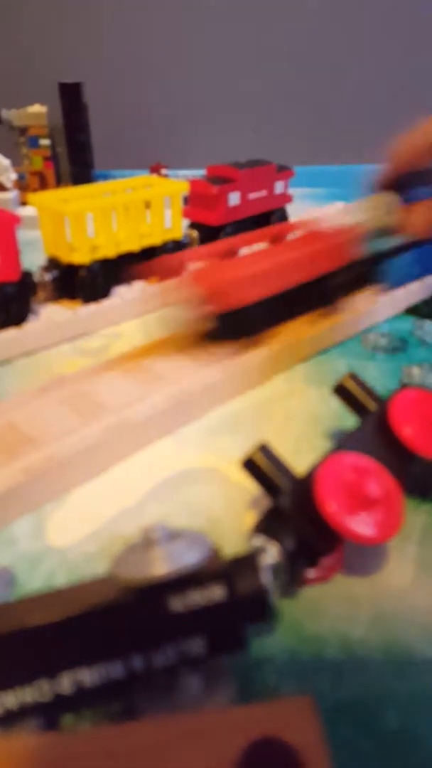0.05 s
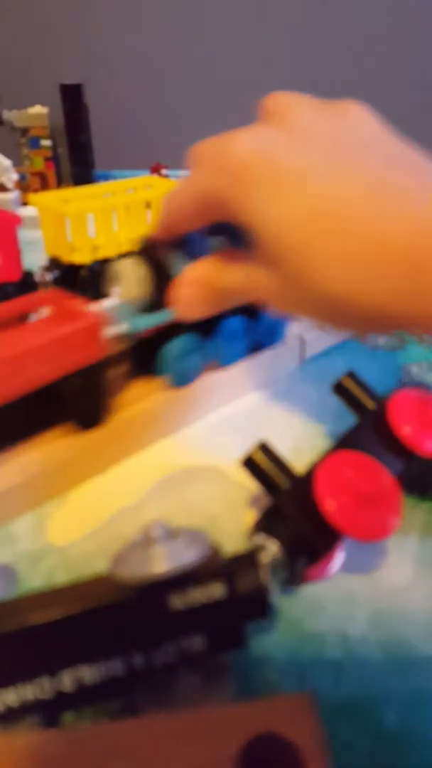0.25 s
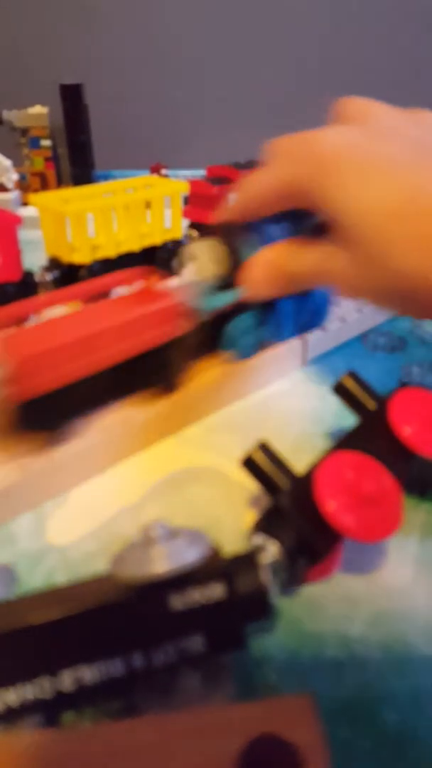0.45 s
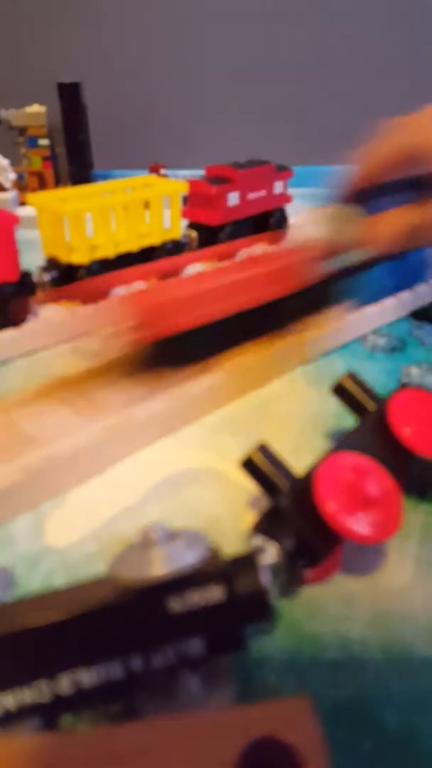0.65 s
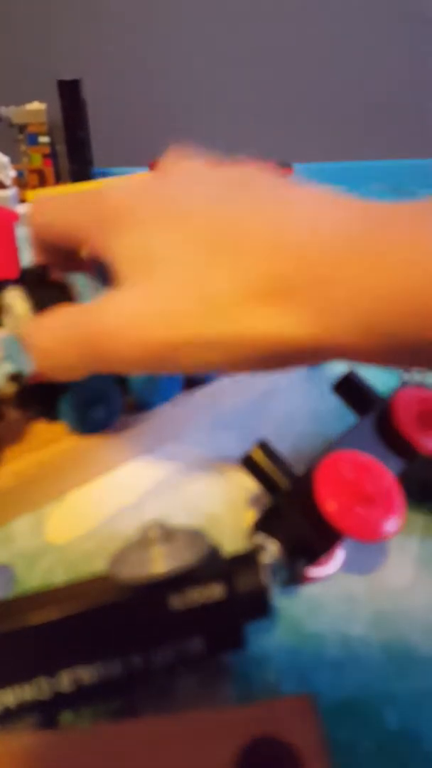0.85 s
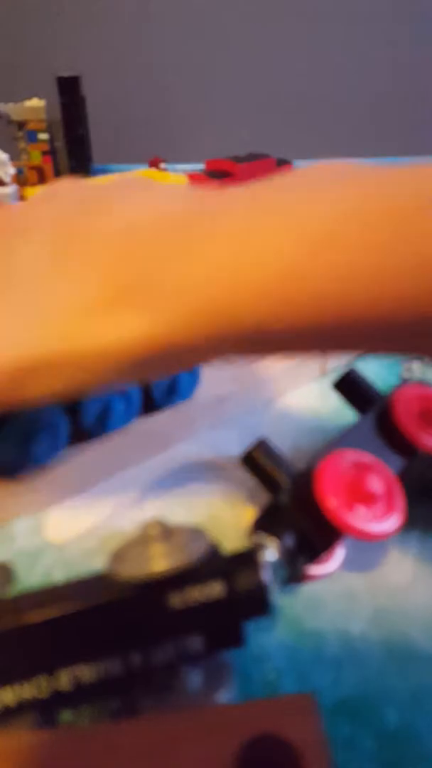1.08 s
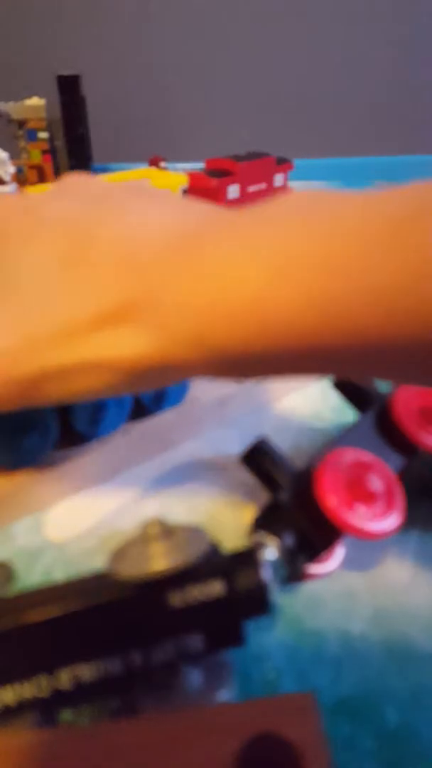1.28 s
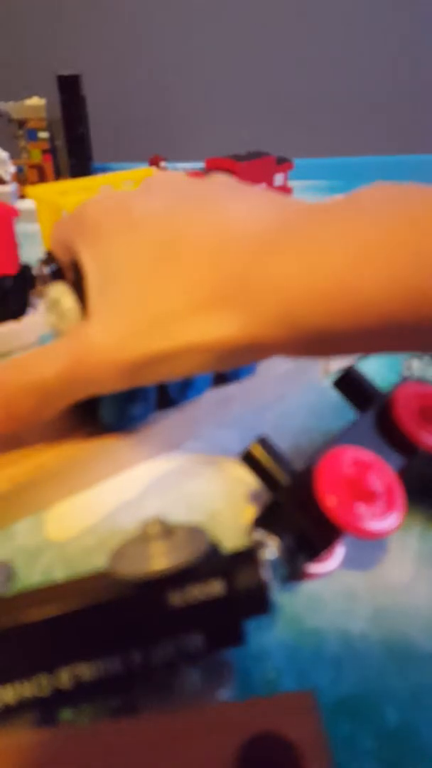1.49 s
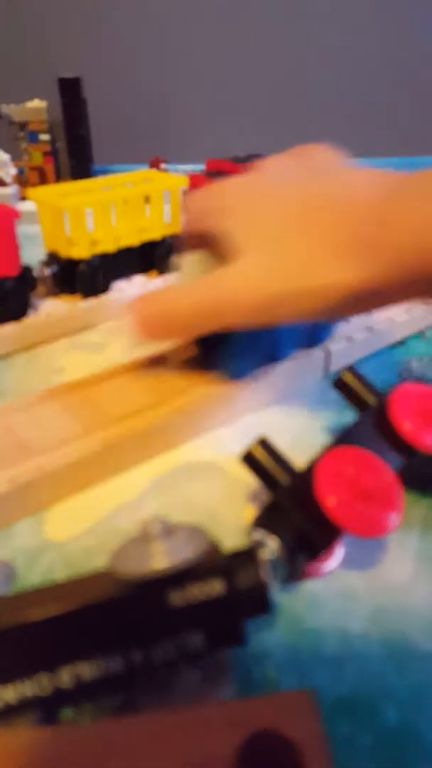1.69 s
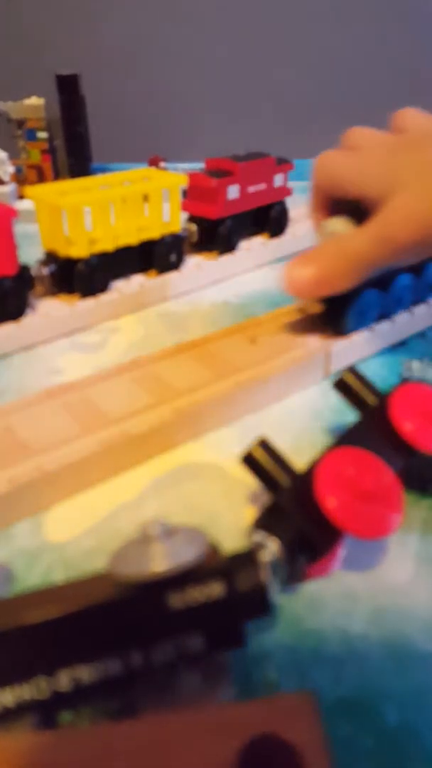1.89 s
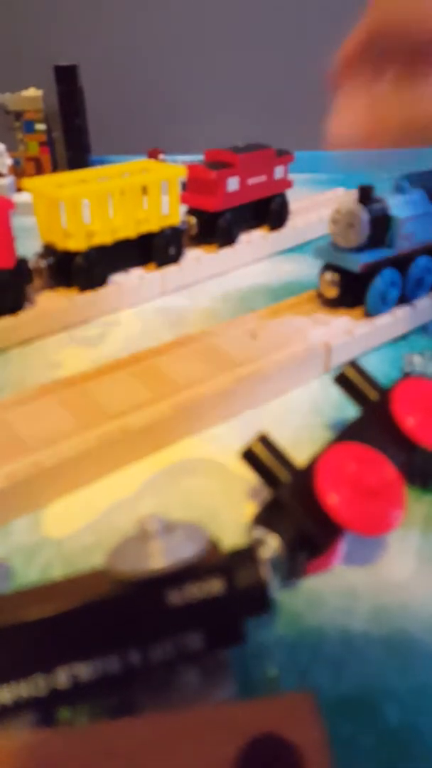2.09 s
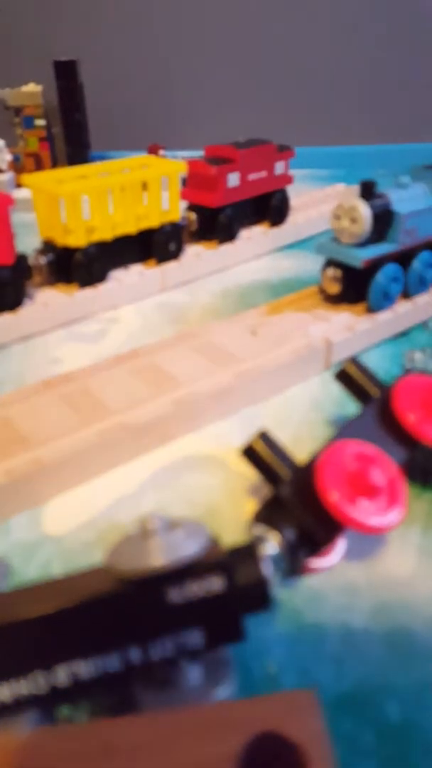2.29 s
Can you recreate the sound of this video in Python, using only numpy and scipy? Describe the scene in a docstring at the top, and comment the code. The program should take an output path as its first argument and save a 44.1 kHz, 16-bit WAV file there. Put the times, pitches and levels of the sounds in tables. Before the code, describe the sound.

Close up in a small room, toy train wheels roll roughly over wood with hard coupling clicks and dull table thumps, nearly pause, scrape briefly, roll back with a low sinking hum, then fade to faint room hush.

```python
"""A small quiet room: a hand pushes wooden toy trains to and fro on a wooden track on a play table.
Wheels bump over the grain and ring track and table, axles rattle, couplings and joints clack, and
the wheels slip with a hiss. Knocks and noise drive sets of dying modes; shaped noise makes the
hiss, hums, scrape and hush. A phone close by hears it through two ports a hand's width apart."""
import sys
import numpy as np
from scipy import signal
from scipy.fft import rfft, irfft, next_fast_len
from scipy.io import wavfile
from scipy.ndimage import uniform_filter1d

SR = 44100
rng = np.random.default_rng(int(sys.argv[2]) if len(sys.argv) > 2 else 0)


def waveform_to_disk(signal):
    """Save audio, clipped to [-1, 1], as 16-bit WAV at the path in sys.argv[1]."""
    frames = np.transpose(np.atleast_2d(signal))
    scaled = np.clip(frames, -1, 1) * 32767
    samples = np.round(scaled).astype(np.int16)
    wavfile.write(sys.argv[1], SR, samples)


def level_to_linear(level):
    """Convert decibel levels to linear amplitude factors, elementwise."""
    exponent = np.asarray(level, float) / 20
    return 10 ** exponent


N = 103194  # length in samples


def evened(x):
    """Scales to rms 1."""
    return x / np.sqrt(np.mean(x ** 2) + 1e-20)


def along(rows, column=1):
    """A table column joined by straight lines in time."""
    rows = np.array(rows)
    return np.interp(np.arange(N) / SR, rows[:, 0], rows[:, column])


def coloured(x, points, share=1):
    """Filters by a share of a spectrum in dB, drawn over log frequency."""
    f, db = np.transpose(points)
    size = next_fast_len(N + 8192)
    hz = np.fft.rfftfreq(size, 1 / SR)
    curve_db = np.interp(np.log(hz + 1), np.log(f + 1), db)
    return irfft(rfft(x, size) * level_to_linear(share * curve_db), size)[..., :N]


def ring(modes):
    """Modes dying away at both ports; each spot weighs them anew, high ones arrive out of step."""
    UNEVEN_DB, DETUNE, APART_HZ = 4, 0.03, 1500  # spreads of level and pitch; ports part around here
    t, out = np.arange(6000) / SR, 0
    for hz, db, t60 in modes:
        weight, bend, turn, sign = rng.standard_normal(4)
        phase = np.array([[1], [-1]]) * turn * np.tanh((hz / APART_HZ) ** 2)
        decay = level_to_linear(db + UNEVEN_DB * weight - 60 * t / t60) / np.sqrt(t60)
        out = out + np.sign(sign) * decay * np.sin(2 * np.pi * hz * (1 + DETUNE * bend) * t + phase)
    out = out * (1 - np.exp(-t * SR / 5))  # soft onset over some 5 samples
    return out / np.linalg.norm(out) * np.sqrt(2)  # mean energy 1 per port


def rattled(modes, per_s, spread_db, smooth_share, level_db, count=10):
    """Random uneven knocks plus fine grain, shared among several contact points of one body."""
    knocks = level_to_linear(spread_db * np.minimum(rng.exponential(1, N), 3)) * (rng.random(N) < per_s / SR)
    knocks = evened(knocks * rng.choice([-1, 1], N))
    spot = rng.integers(0, count, N)
    grain = rng.standard_normal(N)
    drive = (np.sqrt(1 - smooth_share) * knocks + np.sqrt(smooth_share) * grain) * level_to_linear(level_db)
    return sum(signal.oaconvolve((drive * (spot == k))[None], ring(modes))[:, :N]
               for k in range(count))


def struck(blows):
    """Lone soft blows, each a start in seconds, a peak in dB and the modes it sounds."""
    out = np.zeros((2, N + 8000))
    for s, db, modes in blows:
        sound = signal.fftconvolve(ring(modes), np.hanning(8)[None])
        out[:, round(s * SR):][:, :sound.shape[1]] += level_to_linear(db) * sound / abs(sound).max()
    return out[:, :N]


# The room's hush. Each row: frequency in Hz, relative density in dB per Hz.
HUSH_COLOUR = [(18, -20.5), (30, 15.5), (64, -7.5), (109, 1), (740, -8.5), (1070, -6.5), (3870, -33),
               (8300, -38.5), (16000, -27.5)]


def room_hush():
    """Steady coloured noise, mostly alike at both ports."""
    HUSH_DB = -59.5
    noise = 0.38 * rng.standard_normal((2, N)) + rng.standard_normal(N)
    return level_to_linear(HUSH_DB) * evened(coloured(noise, HUSH_COLOUR))


# The hand's push. Each row: time in seconds, rolling force in dB, rattle against rolling in dB,
# wheel slip against rolling in dB; each sound adds its own trim.
PUSH = [(0.0, -12, -11, -9.5), (0.04, -26, 6, -12), (0.06, -28, -22, -5), (0.08, -21.5, -8, -50),
        (0.14, -11.5, -5, -13.5), (0.16, -14.5, -2.5, -42), (0.17, -13.5, 4, -40), (0.23, -15.5, -9, -12.5),
        (0.26, -30.5, -7, -17), (0.34, -26.5, -13, -30), (0.35, -34.5, -2.5, -10), (0.38, -30.5, -9.5, -44),
        (0.45, -65.5, -13, -38), (0.5, -34.5, -18, -57), (0.53, -15.5, -8, -45.5), (0.6, -22, -2, -14.5),
        (0.67, -35.5, -11, -62), (0.7, -19, -9, -35.5), (0.75, -21, -5, -6.5), (0.78, -12, -8, -17),
        (0.83, -27, -1.5, -22.5), (0.89, -32, -14.5, -60), (0.96, -51, 0.5, -9.5), (1.09, -44, -22.5, -40),
        (1.14, -35.5, -17, -20), (1.15, -33, -8.5, -5), (1.2, -40, -4, -45), (1.24, -30, -6.5, -8.5),
        (1.34, -71.5, 6.5, -25.5), (1.38, -45.5, -18, -41.5), (1.4, -19.5, -36.5, -15),
        (1.43, -36.5, 7.5, -7), (1.45, -20, -17, -18), (1.49, -30, -7.5, -26.5), (1.58, -42.5, -26, -19.5),
        (1.62, -29, -17, -56), (1.66, -22, -24, -53.5), (1.68, -25, -8.5, -45), (1.7, -18.5, -13.5, -62),
        (1.77, -18, -11.5, -58), (1.79, -13.5, -10.5, -17.5), (1.83, -26.5, -2.5, -19),
        (1.86, -20.5, -10, -18), (1.88, -31, -10.5, -5.5), (1.92, -28, -10.5, -10), (1.99, -41, 1.5, 4.5),
        (2.02, -18.5, -21, -23), (2.05, -21.5, -5.5, -32), (2.1, -52, 4.5, -7), (2.14, -42.5, -19.5, -25.5),
        (2.34, -76.5, -19, -3.5)]
# Modes of track and table. Each row: centre pitch in Hz, relative level in dB, t60 in seconds.
TABLE_MODES = [(206.5, 1.5, 0.24), (270, 11, 0.12), (352.9, -4.5, 0.078), (392.7, 16.5, 0.033),
               (625, 11.5, 0.027), (684, 8, 0.0087), (763, 7, 0.037), (900.4, 12, 0.014), (972, 3.5, 0.077),
               (1038.5, 1, 0.09)]
UPPER_HZ = 500  # parts the low modes from the upper ones
LOW_MODES = [m for m in TABLE_MODES if m[0] < UPPER_HZ]
UPPER_MODES = [m for m in TABLE_MODES if m[0] >= UPPER_HZ]


def rolling(force_db):
    """Wheel bumps ring track and table; the upper modes grow faster with force."""
    BUMPS_PER_S, SPREAD_DB, GRAIN_SHARE = 350, 3, 0.53
    BRIGHTEN = 0.26  # extra dB in the upper modes per dB of force
    low = rattled(LOW_MODES, BUMPS_PER_S, SPREAD_DB, GRAIN_SHARE, force_db - 5.5)
    upper_db = (1 + BRIGHTEN) * force_db - 1.5
    return low + rattled(UPPER_MODES, BUMPS_PER_S, SPREAD_DB, GRAIN_SHARE, upper_db)


# Modes of wheels and axles. Each row: centre pitch in Hz, relative level in dB, t60 in seconds.
WHEEL_MODES = [(1440, -11.5, 0.0033), (2020, -3, 0.0026), (2290, -1.5, 0.0083), (2684, -10.5, 0.011),
               (3016, -6.5, 0.012), (3290, -4.5, 0.0087), (3763, -13.5, 0.01), (4644, -32.5, 0.0096),
               (5078, -15, 0.014), (5875, -27.5, 0.016), (7370, -29, 0.0057), (9000, -35, 0.0016),
               (10630, -27, 0.0071)]
RATTLES_PER_S, RATTLE_SPREAD_DB, RUB_SHARE = 700, 4.2, 0.08


def wheel_rattle(force_db):
    """Loose wheels and axles knock at random and ring briefly."""
    level_db = force_db + along(PUSH, column=2) - 2.0
    return rattled(WHEEL_MODES, RATTLES_PER_S, RATTLE_SPREAD_DB, RUB_SHARE, level_db)


# The slip hiss. Each row: frequency in Hz, relative density in dB per Hz.
SKID_COLOUR = [(940, -38.5), (1800, -7), (2850, -5), (5870, -16), (8890, -27), (10800, -20.5),
               (12900, -33.5), (14500, -33.5), (15500, -55), (16000, -80)]


def skid(force_db):
    """Wheels slipping on the wood: a fine hiss that catches on the grain."""
    SLIP_DB, GRAIN_DB = 3.5, 2.5  # trim, rms flutter of the level
    noise = rng.standard_normal((2, N)) + 0.39 * rng.standard_normal(N)  # partly shared by the ports
    hiss = evened(coloured(noise, SKID_COLOUR))
    grain_db = GRAIN_DB * evened(uniform_filter1d(rng.standard_normal(N), size=300))
    return hiss * level_to_linear(force_db + along(PUSH, column=3) + SLIP_DB + grain_db)


# The table top's deep hum. Each row: frequency in Hz, relative density in dB.
TABLE_HUM_COLOUR = [(30, -22.5), (60, -6), (100, 5), (160, -6), (230, -19), (400, -69.5)]


def table_hum(force_db):
    """The table top's deep, sluggish answer to the rolling: low noise whose level lags the force."""
    LEVEL_DB, LAG_S = -22.5, 0.03
    pace = 1 / (LAG_S * SR)
    slow_force = signal.lfilter([pace], [1, pace - 1], level_to_linear(force_db))
    return evened(coloured(rng.standard_normal(N), TABLE_HUM_COLOUR)) * slow_force * level_to_linear(LEVEL_DB)


# Clacks of couplings and track joints. Each row: start in seconds, tick peak in dB, thump peak in dB,
# sharp edge against tick in dB, centre pitch of the part struck in Hz.
CLACKS = [(0.0318, -7, -13, -28, 1900), (0.0931, -14.5, -30, -32, 3200), (0.1381, -8.5, -12.5, -9.5, 3160),
          (0.168, 4.5, -7, -34, 2980), (0.192, 2, -24.5, -30, 3450), (0.2085, -28, -2.5, -18.5, 3290),
          (0.2189, -4.5, -13.5, -14.5, 2290), (0.2902, -24.5, -28, -33, 2300),
          (0.345, -15, -38, -22.5, 1700), (0.5295, -6, -14, -41, 3330), (0.558, -17, -31, -22.5, 2950),
          (0.5851, -11, -11.5, -30.5, 2690), (0.698, -22.5, -13.5, -36, 2320),
          (0.7108, -11.5, -20, -15.5, 2700), (0.7405, 1.5, -11, -14, 2380),
          (0.764, -6.5, -10.5, -26.5, 3600), (0.7834, -31.5, -14.5, -26, 3640),
          (0.958, -36, -59, -10.5, 2300), (1.1118, -48, -43.5, 2, 2260), (1.1471, -15, -26, -7.5, 1550),
          (1.1617, -36.5, -25, -27, 3220), (1.1964, -18, -20.5, -22.5, 1400),
          (1.2222, -21.5, -25, -16, 1710), (1.2313, -30.5, -30.5, -27.5, 3000),
          (1.3947, -19, -19, -14.5, 1620), (1.4053, -11, -24, -7.5, 2400), (1.4496, -48, -12.5, -21, 3330),
          (1.4699, -14, -37, -22.5, 1680), (1.588, -38.5, -35, -27, 1550),
          (1.6059, -26.5, -27, -33.5, 3140), (1.641, -31, -15.5, -23, 1830),
          (1.6832, -15, -40, -29.5, 3140), (1.709, -15, -24, -42, 3230), (1.7799, -15, -9, -24.5, 1880),
          (1.7891, -9, -13, -16.5, 2330), (1.8211, -19, -5.5, -31, 2300), (1.8475, -20.5, -52, -19, 2530),
          (2.0182, -24.5, -22.5, -23.5, 2230), (2.0495, -14, -49, -36.5, 2350),
          (2.152, -32.5, -31, -34, 1500), (2.312, -63, -49.5, -14, 2780)]


def clacks():
    """A gritty hard contact rings wheels and part struck; a soft push thumps track and table."""
    TICK_S, RISE_S, THUMP_S = 0.002, 0.0007, 0.0015  # grit decay, grit rise, length of the push
    PART_DB, PART_T60_S = 3, 0.02
    EDGE_TILT, EDGE_DULL = 0.7, 0.44  # zero and pole that thin the edge's bass
    out, t = np.zeros((2, N + 8000)), np.arange(400) / SR
    for s, tick_db, thump_db, edge_db, part_hz in CLACKS:
        grit = rng.standard_normal((2, 400)) * np.exp(-t / TICK_S) * (1 - np.exp(-t / RISE_S))
        grit /= np.linalg.norm(grit[0])
        contact = grit[:1] / 2 + (np.arange(400) == round(RISE_S * SR))  # bounces round one hard hit
        tick = signal.fftconvolve(contact, ring(WHEEL_MODES + [(part_hz, PART_DB, PART_T60_S)]))
        hump = np.hanning(400)[np.minimum(t / THUMP_S * 399, 399).astype(int)]
        thump = signal.fftconvolve(np.gradient(hump)[None], ring(TABLE_MODES))
        clack = level_to_linear(tick_db) * tick / abs(tick).max() + level_to_linear(thump_db) * thump / abs(thump).max()
        edge = signal.lfilter([1, -EDGE_TILT], [1, -EDGE_DULL], grit + grit[0])
        clack[:, :400] += level_to_linear(tick_db + edge_db) * edge / abs(edge).max()
        out[:, round(s * SR):][:, :clack.shape[1]] += clack
    return out[:, :N]


# Soft nudges of the track. Each row: start in seconds, peak in dB.
NUDGES = [(1.058, -43), (1.085, -30.5), (1.104, -29), (1.399, -15), (1.618, -21.5)]


def nudges():
    """Soft blows that sound only the low modes of track and table."""
    return struck([(s, db, LOW_MODES) for s, db in NUDGES])


# A loose axle's chatter through the roll back. Each row: time in seconds, level in dB.
AXLE = [(1.59, -86), (1.61, -61), (1.69, -28.5), (1.79, -35), (1.85, -95)]
# Its two modes. Each row: centre pitch in Hz, relative level in dB, t60 in seconds.
AXLE_MODES = [(3234, 0, 0.012), (1500, -0.5, 0.015)]


def axle_chatter():
    """A loose axle knocks at random at four contact points and rings on two modes."""
    return rattled(AXLE_MODES, RATTLES_PER_S / 2, RATTLE_SPREAD_DB, RUB_SHARE, along(AXLE), count=4)


# The hum of the long roll back, sinking as the train moves off along the track.
# Each row: time in seconds, centre pitch in Hz, level in dB.
HUM = [(1.6, 270, -66), (1.68, 267.1, -19.5), (1.8, 252.2, -27.5), (1.86, 193.1, -40.5),
       (1.93, 161.9, -23.5), (2.05, 174.3, -43.5), (2.2, 196.8, -46), (2.3, 184.7, -100.5)]


def roll_back_hum():
    """Rolling noise in one track resonance whose pitch glides, mostly downward."""
    WIDTH_HZ = 45
    carrier = np.exp(2j * np.pi * np.cumsum(along(HUM)) / SR)
    r = np.exp(-np.pi * WIDTH_HZ / SR)
    noise = rng.standard_normal(N) + 1j * rng.standard_normal(N)
    slow = signal.lfilter([1], [1, -2 * r, r * r], noise)
    return evened((carrier * slow).real) * level_to_linear(along(HUM, column=2))


# A dragging wheel's scrape. Each row: time in seconds, level in dB.
DRAG = [(1.83, -98), (1.87, -43), (2.0, -49), (2.08, -99)]
# Its band: lower edge in Hz, upper edge in Hz.
DRAG_BAND = [10300, 11770]


def drag():
    """A wheel drags with a thin high scrape: dense fine grains through one high band."""
    grains = rng.standard_normal((2, N)) * rng.exponential(1, N)
    band = signal.butter(3, DRAG_BAND, "band", fs=SR, output="sos")
    return evened(signal.sosfilt(band, grains)) * level_to_linear(along(DRAG))


# A faint tone after the train stops. Each row: time in seconds, level in dB.
TONE = [(2.04, -99), (2.1, -50), (2.21, -61), (2.23, -69), (2.26, -58), (2.29, -79.5), (2.33, -73.5)]


def faint_tone():
    """Noise through two like narrow peaks: a tone that wavers."""
    TONE_HZ, WIDTH_HZ = 942, 10  # width of each peak
    b, a = signal.iirpeak(TONE_HZ, TONE_HZ / WIDTH_HZ, SR)
    narrow = signal.lfilter(b, a, signal.lfilter(b, a, rng.standard_normal(N)))
    return evened(narrow) * level_to_linear(along(TONE))


# Small parts that ring on alone as the train stops.
# Each row: start in seconds, centre pitch in Hz, peak in dB, t60 in seconds.
RINGS = [(2.082, 2640, -33.5, .05), (2.165, 4400, -57, .05)]


def lone_rings():
    """Single small parts, each ringing on one mode."""
    return struck([(s, db, [(hz, 0, t60)]) for s, hz, db, t60 in RINGS])


def echoes(t60_s, start_s, low_hz):
    """Sparse taps of random sign, other ones for each port, dying away, with the bass cut."""
    t = np.arange(round(0.4 * SR)) / SR
    taps = rng.choice([-1., 1.], (2, len(t))) * (rng.random((2, len(t))) < 0.05)
    taps *= (t > start_s) * level_to_linear(-60 * t / t60_s)
    taps /= np.linalg.norm(taps, axis=1)[:, None]  # energy 1 before the bass cut
    return signal.lfilter(*signal.butter(1, low_hz, "high", fs=SR), taps)


def scene():
    """All the train's sounds, with echoes off toys and walls, over the hush of the room."""
    NEAR_DB, ROOM_DB = -16, -10.5
    hush = room_hush()
    force_db = along(PUSH)
    train = rolling(force_db) + wheel_rattle(force_db) + skid(force_db) + table_hum(force_db)
    train = train + clacks() + nudges() + axle_chatter() + roll_back_hum()
    train = train + drag() + faint_tone() + lone_rings()
    toys = level_to_linear(NEAR_DB) * echoes(t60_s=0.03, start_s=0.0004, low_hz=660)
    walls = level_to_linear(ROOM_DB) * echoes(t60_s=0.23, start_s=0.006, low_hz=100)
    return train + signal.fftconvolve(train, toys + walls, axes=1)[:, :N] + hush


def roll_off(x):
    """The treble ends steeply here."""
    return signal.sosfilt(signal.butter(12, 16480, fs=SR, output="sos"), x)


# Colour of the ports. Each row: frequency in Hz, left over right in dB before record() takes a share.
PORT_COLOUR = [(60, 4), (110, 0), (200, -1.5), (380, -4.5), (700, -5.5), (1290, 5), (2380, -9.5),
               (4400, -8.5), (8120, 0.5), (15000, 0)]


def record(dry):
    """The right port hears later and each has its own colour; bass and top are cut, peaks clip."""
    LAG, LOW_HZ, TOP_HZ = 10, 93.2, 15000  # right port's delay in samples, the two cut frequencies
    left = coloured(dry[0], PORT_COLOUR, share=0.5)
    right = np.pad(coloured(dry[1], PORT_COLOUR, share=-0.0083), (LAG, 0))[:N]
    ports = np.array([left, right])
    ports = signal.sosfilt(signal.butter(3, LOW_HZ, "high", fs=SR, output="sos"), ports)
    ports = signal.sosfilt(signal.butter(4, TOP_HZ, fs=SR, output="sos"), ports)
    return roll_off(np.clip(ports, -1, 1))


dry = scene()
out = record(dry)
waveform_to_disk(out)
```